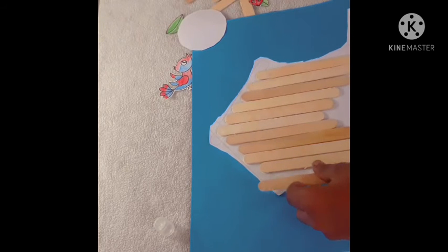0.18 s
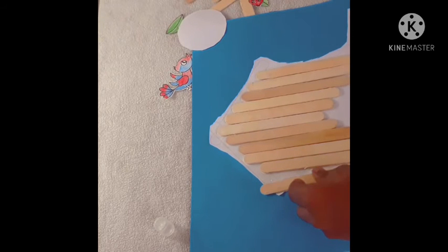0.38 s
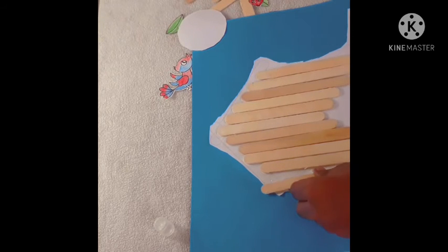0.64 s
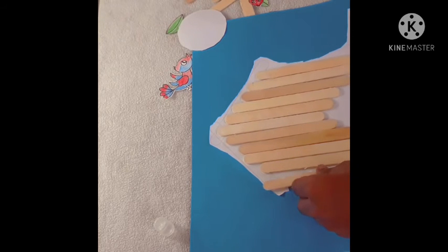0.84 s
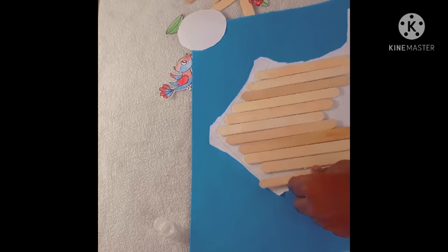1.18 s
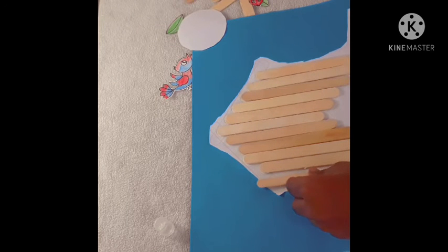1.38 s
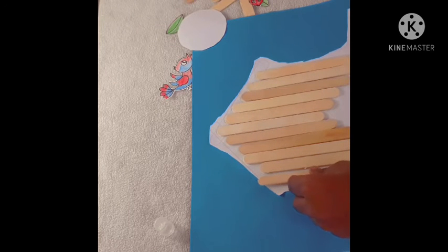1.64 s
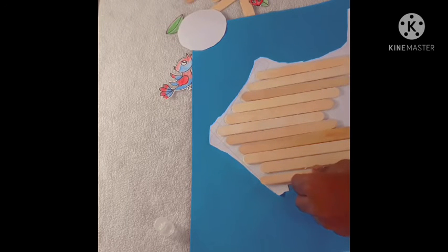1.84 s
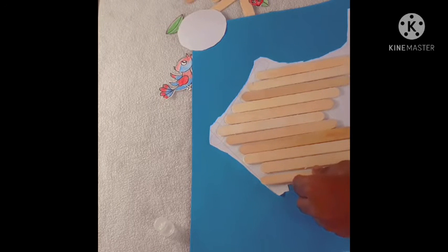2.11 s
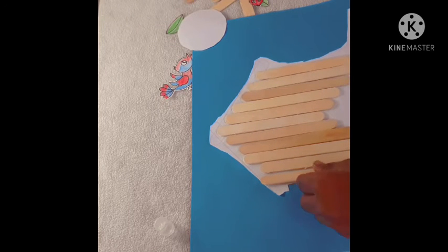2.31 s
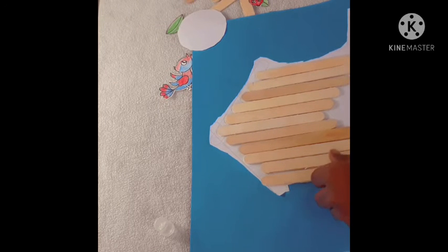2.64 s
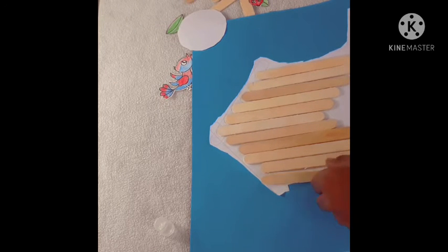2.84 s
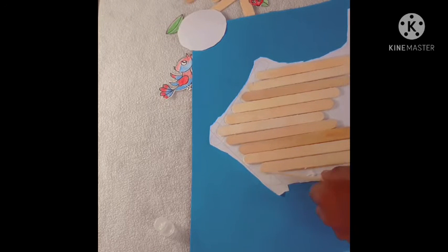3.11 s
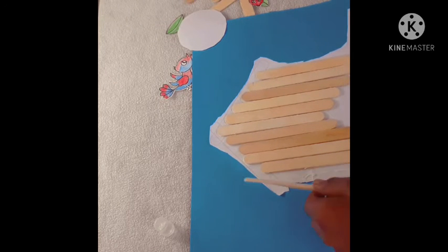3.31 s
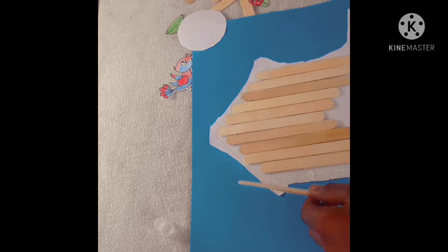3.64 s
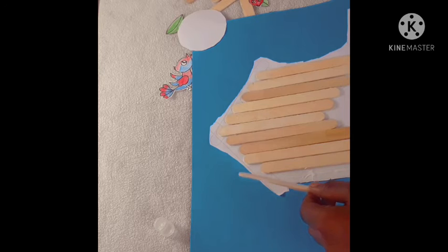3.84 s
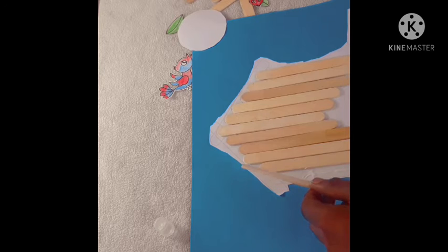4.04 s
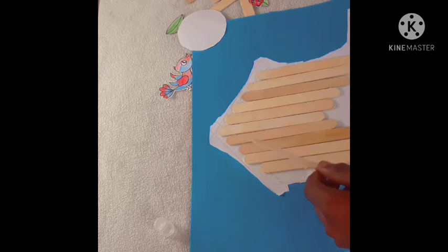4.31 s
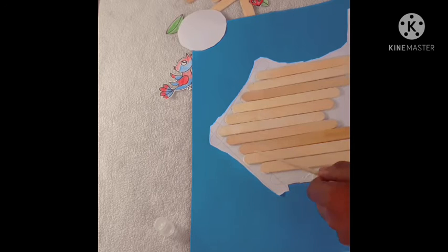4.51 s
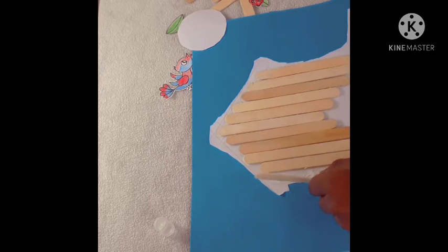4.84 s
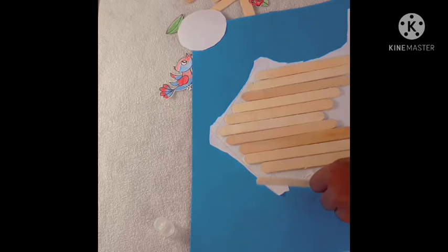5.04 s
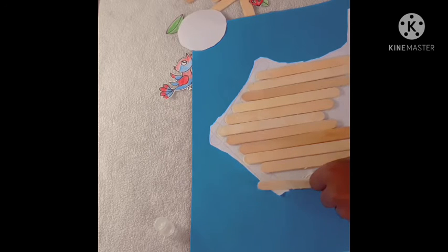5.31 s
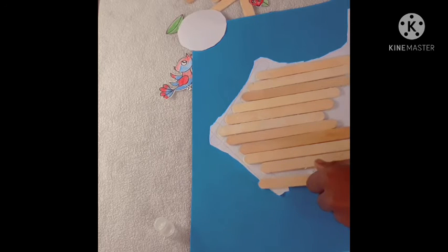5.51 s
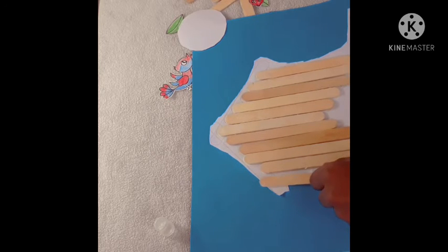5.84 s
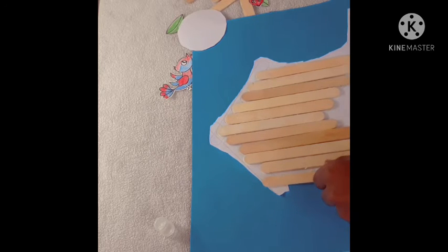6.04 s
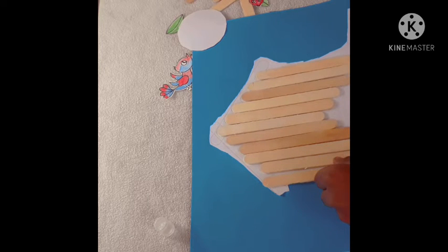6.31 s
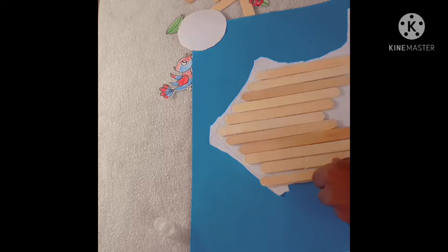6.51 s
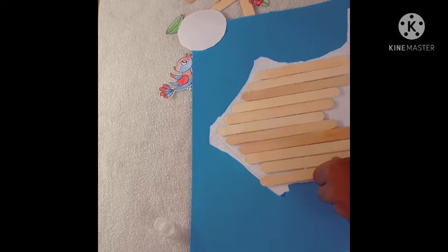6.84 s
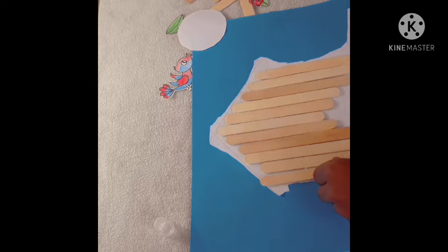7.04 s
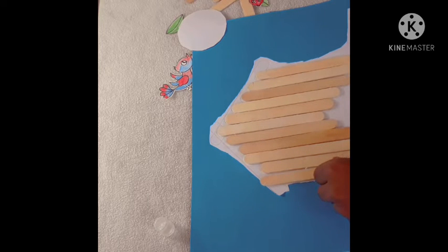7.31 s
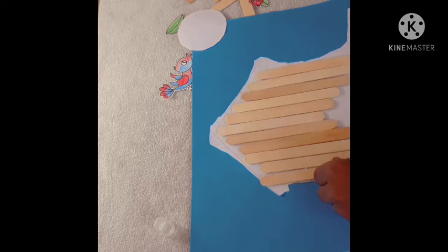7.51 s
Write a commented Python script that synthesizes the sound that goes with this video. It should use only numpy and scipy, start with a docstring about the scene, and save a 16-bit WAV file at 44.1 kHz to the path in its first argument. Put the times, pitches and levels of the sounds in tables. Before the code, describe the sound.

Steady electrical buzz and hiss over a soft fan, with a few light taps and rubs of wooden craft sticks on paper.

```python
"""A quiet room, phone microphone close to wooden craft sticks being laid on a paper picture.
Throughout, mains switching edges buzz and spit in the microphone lead, over a fan and preamp hiss.
A stick slides and knocks twice at the start; faint, thin rings follow. From 2.6 s come lighter taps
and short rubs of wood on paper. Static clicks at 5.0 and 6.7 s, and two faint tones fade at the end."""
import sys
import numpy as np
from scipy import signal
from scipy.fft import rfft, irfft, next_fast_len
from scipy.io import wavfile
from scipy.ndimage import uniform_filter1d

SR = 44100
rng = np.random.default_rng(int(sys.argv[2]) if len(sys.argv) > 2 else 0)


def dump_mix(stems):
    """Bounce the given channels to the path in sys.argv[1] as a 16-bit WAV at rate SR."""
    frames = np.atleast_2d(stems).T  # one column per channel
    limited = np.clip(frames, -1, 1)  # hard clip at full scale
    pcm = np.round(limited * 32767).astype(np.int16)
    wavfile.write(sys.argv[1], SR, pcm)


N = 338247
MAINS_HZ, TOP_HZ = 49.948, 15500
KNOCK_HZ = 2200  # crack pitch of a full knock; glancing touches are higher

# switching edges in one mains cycle: time_ms, spike_height, spike_corner_hz, rebound_height, needle_height
EDGES = [(.23, .00041, 3200, -.0158, .019), (3.33, .0001, 4800, .0026, .006),
         (8.55, -.00054, 3400, .0195, .002), (10.24, 0, 3400, 0, -.016), (13.3, .0001, 6200, .0005, -.009),
         (16.88, -.00066, 3750, .0164, .008)]
# spectrum of the interference's treble: frequency_hz, gain_db
TREBLE_COLOUR = [(1000, -28), (3500, -37), (6000, 1), (10000, 0.5), (14000, -5.5), (15100, 3),
                 (15600, -0.5)]
# sliding strokes of sticks and fingers: middle_s, length_s, level_db, centre_hz
STROKES = [(0.148, 0.13, -58.5, 7500), (.678, 0.07, -59, 7200), (2.71, 0.14, -58, 4400),
           (2.931, 0.11, -59.5, 7000), (2.987, 0.02, -48, 4400), (3.054, .04, -52, 4160),
           (4.297, 0.055, -45, 510), (4.3, 0.075, -57, 3960), (4.555, .11, -56, 2900),
           (5.69, .14, -59.5, 4970), (5.998, .08, -61, 6000), (6.158, 0.04, -52, 3200)]


def amp(db):
    """Decibels to gain."""
    return 10 ** (np.asarray(db) / 20)


def unit(x):
    """Scaled to rms 1."""
    return x / np.sqrt(np.mean(x ** 2) + 1e-20)


def along(points, hz):
    """(frequency_hz, value) points read on a log axis."""
    point_hz, values = np.transpose(points)
    return np.interp(np.log(hz + 1), np.log(point_hz + 1), values)


def filtered(x, response):
    """x through a frequency response."""
    size = next_fast_len(len(x) + 8192)
    return irfft(rfft(x, size) * response(np.fft.rfftfreq(size, 1 / SR)), size)[:len(x)]


def noise(spectrum):
    """Noise of rms 1 with the given colour."""
    return unit(filtered(rng.standard_normal(N), lambda hz: amp(along(spectrum, hz))))


def band(size, centre_hz, width_hz):
    """Noise of rms 1 in one resonance."""
    hz = np.fft.rfftfreq(size, 1 / SR)
    detune = (hz ** 2 - centre_hz ** 2) / (hz * width_hz + 1e-9)
    return unit(irfft(rfft(rng.standard_normal(size)) / (1 + detune ** 2), size))


def fading(hz, width_hz, db, t60_s, rise_s=0.016):
    """A fuzzy tone that swells quickly and fades."""
    t = np.arange(SR) / SR
    return amp(db - 60 * t / t60_s) * (1 - np.exp(-t / rise_s)) * band(len(t), hz, width_hz)


def add(track, start_s, sound):
    """Mix a sound into the track."""
    part = track[max(round(start_s * SR), 0):][:len(sound)]
    part += sound[:len(part)]


def mains_buzz(buzz_db=-1.42, rebound_hz=203, coupling_hz=86, ripple=0.39):
    """Interference in the lead: each switching edge is a sharp spike and a slow rebound, every cycle."""
    # partials of the low hum: mains_multiple, rms_db
    hum_partials = [(1, -41.1), (2, -39), (3, -38), (4, -40.8), (5, -43.5), (6, -53.5), (7, -50.5),
                    (8, -49.5), (9, -54), (10, -50.3), (17, -57.5), (19, -57.5)]
    # wiry overtones that stand out of the buzz: mains_multiple
    overtones = [*range(14, 50, 6), *range(50, 99, 12), *range(51, 88, 12)]
    comb_db, comb_db_per_octave = -53.8, -5.5
    hz = MAINS_HZ * np.arange(1, int(TOP_HZ / MAINS_HZ) + 1)
    lag = lambda corner_hz: (1 + 1j * hz / corner_hz) ** -3
    delay = lambda ms: np.exp(-2j * np.pi * hz * ms / 1000)
    spikes = sum(delay(ms) * height * lag(corner) for ms, height, corner, _, _ in EDGES)
    rebounds = sum(delay(ms) * height for ms, _, _, height, _ in EDGES) * lag(rebound_hz)
    fine_ripple = ripple * uniform_filter1d(abs(spikes), size=15) * np.exp(2j * np.pi * rng.random(len(hz)))
    bass_cut = 1j * hz / (1j * hz + coupling_hz)  # the input's coupling capacitor
    harmonics = amp(buzz_db) * (spikes + rebounds + fine_ripple) * bass_cut
    # hum and comb keep their phases but take their own levels
    comb = [(k, comb_db + comb_db_per_octave * np.log2(k / overtones[0])) for k in overtones]
    multiple, db = np.transpose(hum_partials + comb)
    index = np.round(multiple).astype(int) - 1
    harmonics[index] *= np.sqrt(2) * amp(db) / abs(harmonics[index])
    size = 8192
    cycle = irfft(np.r_[0, harmonics], size) * size / 2
    return np.interp(np.arange(N) / SR * MAINS_HZ, np.arange(size) / size, cycle, period=1)


def mains_spit(spit_db=-2.3, jitter_ms=0.0058, wander_ms=0.031, scatter_db=2):
    """Needle pulses at the switching edges; their timing trembles, which blurs the highest overtones."""
    cycle_starts = np.arange(0, N / SR, 1 / MAINS_HZ)[:, None]
    edge_ms, *_, needle_height = np.transpose(EDGES)
    shape = len(cycle_starts), len(EDGES)
    wander = unit(uniform_filter1d(rng.standard_normal(cycle_starts.shape), size=60, axis=0))
    ms = edge_ms + jitter_ms * rng.standard_normal(shape) + wander_ms * wander
    position = ((cycle_starts + ms / 1000) * SR)[..., None]
    height = (needle_height * amp(spit_db + scatter_db * rng.standard_normal(shape)))[..., None]
    # a windowed sinc places each needle between samples
    index = position.astype(int) + np.arange(-7, 9)
    needles = height * np.sinc(index - position) * np.sinc((index - position) / 8)
    train = np.bincount(abs(index).ravel(), needles.ravel(), N)[:N]
    return filtered(train, lambda hz: amp(along(TREBLE_COLOUR, hz)))


def mains_sizzle(sizzle_db=-65.0, crest_db=-57, rise_ms=1.0, locked_share=0.74, rest_ms=(3.6, 8.3)):
    """Bright noise that builds towards each half cycle's first edge; much of it repeats with the mains."""
    cycle_ms = 1000 / MAINS_HZ
    ms = np.arange(N) / SR * 1000 % cycle_ms
    to_edge_ms = (EDGES[0][0] - ms) % (cycle_ms / 2)
    swell = np.exp(-(to_edge_ms / rise_ms) ** 2)
    active = (ms < rest_ms[0]) | (ms > rest_ms[1])
    repeating = np.resize(noise(TREBLE_COLOUR)[:round(SR / MAINS_HZ)], N)
    grain = np.sqrt(locked_share) * repeating + np.sqrt(1 - locked_share) * noise(TREBLE_COLOUR)
    return (amp(sizzle_db) * active + amp(crest_db) * swell) * grain


def fan(rush_db=-42.0, waver_hz=5):
    """A fan in the room: a soft rush of air with a few unsteady low tones."""
    # spectrum of the rush: frequency_hz, gain_db
    rush_colour = [(20, -13), (60, -10), (120, -3.5), (200, 0.5), (480, -1.5), (640, -9), (850, -7.5),
                   (1050, -4), (1400, -12), (2000, -16.5), (3000, -21.5), (4100, -25), (5200, -29.5),
                   (12000, -43.5)]
    # the fan's drone: pitch_hz, rms_db
    tones = [(185, -55), (198, -53.5), (258, -57.5), (396, -56), (493, -57.5)]
    return amp(rush_db) * noise(rush_colour) + sum(amp(db) * band(N, hz, waver_hz) for hz, db in tones)


def preamp(hiss_db=-63.5, whine_db=-79, whine_hz=13561):
    """The microphone preamplifier's steady hiss and thin whine."""
    # spectrum of the hiss: frequency_hz, gain_db
    hiss_colour = [(500, -8), (3000, -8), (8000, -2), (13000, -4), (14400, -5), (15100, -3), (15600, 2)]
    return amp(hiss_db) * noise(hiss_colour) + amp(whine_db) * band(N, whine_hz, width_hz=30)


def rubs(grain_db=3, relative_width=0.72):
    """Short, grainy swells of wood sliding on paper."""
    out, t = np.zeros(N), np.arange(-SR // 4, SR // 4) / SR
    for middle_s, length_s, db, hz in STROKES:
        grain = amp(grain_db * unit(uniform_filter1d(rng.standard_normal(len(t)), size=90)))
        friction = unit(grain * band(len(t), hz, relative_width * hz))
        swell = amp(db) * np.exp(-2 * (t / length_s) ** 2)
        in_scene = t > -middle_s
        add(out, middle_s + t[in_scene][0], (swell * friction)[in_scene])
    return out


def stick_touch(peak_db, hz, crack_t60_s=0.013, relative_width=1.4, soft_hz=10000):
    """A short, dry crack; the fuller the knock, the more it rings the stick's damped modes."""
    # modes of a stick lying on paper: pitch_hz, level_db, t60_s
    modes = [(1100, 6, 0.012), (1590, -3, .014), (1830, 16, 0.0095), (2390, 18, 0.0082), (2840, 4.5, 0.027),
             (3060, -25, .16), (4300, 1, 0.011), (6500, 3, 0.0077), (7500, -2, 0.0099)]
    knock_ring_db, ring_db_per_octave = -1.5, -11.5
    t = np.arange(SR // 6) / SR
    ring_db = knock_ring_db + ring_db_per_octave * abs(np.log2(hz / KNOCK_HZ))
    ring = sum(amp(db + rng.normal(0, 0.97) - 60 * t / t60_s) * np.sin(2 * np.pi * mode_hz * t)
               for mode_hz, db, t60_s in modes)
    crack = amp(-60 * t / crack_t60_s) * band(len(t), hz, relative_width * hz)
    # wood on paper is too soft a contact for the top octave
    lowpass = signal.butter(2, soft_hz, fs=SR, output="sos")
    tap = signal.sosfilt(lowpass, crack + amp(ring_db) * ring)
    return -amp(peak_db) * tap / abs(tap).max()


def catches(per_stroke=2, scatter=0.5):
    """A sliding stick catches: tiny ticks at random moments around each stroke's middle."""
    out = np.zeros(N)
    for middle_s, length_s, _, _ in STROKES:
        for offset in rng.standard_normal(per_stroke):
            add(out, middle_s + scatter * length_s * offset, stick_touch(peak_db=-38, hz=5000))
    return out


def taps(after_ring_hz=2800, after_ring_db=-29, pitch_follow=0.31):
    """Each stick set down cracks, followed by a brief, fuzzy after-ring, higher after a higher crack."""
    # sticks touching: start_s, peak_db, pitch_hz
    touches = [(0.2823, -17.5, 2100), (0.3012, -18, 2300), (2.638, -29, 4000), (2.729, -24, 4200),
               (2.992, -26.5, 4800), (3.057, -28, 3970), (4.481, -34, 2200), (5.405, -28, 3300),
               (5.596, -30, 4600), (6.1248, -29, 5200), (6.137, -22.5, 5440)]
    out = np.zeros(N)
    for start_s, db, hz in touches:
        add(out, start_s, stick_touch(db, hz))
        ring_hz = after_ring_hz * (hz / KNOCK_HZ) ** pitch_follow
        add(out, start_s, fading(ring_hz, width_hz=900, db=db + after_ring_db, t60_s=0.32))
    return out


def room(x):
    """A small room's tail, shorter in the treble."""
    # the room's decay: frequency_hz, t60_s
    decay = [(300, 0.22), (2800, 0.16), (6000, 0.073), (14000, 0.096)]
    hz, t, spectra = signal.stft(rng.standard_normal(SR // 2), SR, nperseg=256)
    tail = signal.istft(spectra * amp(-60 * t / along(decay, hz)[:, None]), SR, nperseg=256)[1]
    return signal.fftconvolve(x, tail / np.linalg.norm(tail))[:N]


def faint_rings(ping_width_hz=110):
    """Two thin, high pings and three lower tones, each fading away."""
    # high pings: start_s, level_db, t60_s
    pings = [(.655, -52, 0.49), (1.19, -61, .75)]
    # the two partials of every ping: pitch_hz, gain_db
    ping_partials = [(9900, -3.5), (10310, -1.5)]
    # lower tones: start_s, pitch_hz, width_hz, level_db, t60_s
    tones = [(.67, 2050, 170, -51, 1.4), (7.16, 1850, 40, -50.5, 1.6), (7.2, 400, 12, -41, 1.1)]
    out = np.zeros(N)
    for start_s, db, t60_s in pings:
        for hz, gain_db in ping_partials:
            add(out, start_s, fading(hz, ping_width_hz, db + gain_db, t60_s))
    for start_s, hz, width_hz, db, t60_s in tones:
        add(out, start_s, fading(hz, width_hz, db, t60_s))
    return out


def static_clicks(swing_decay_s=0.00024, snap_decay_s=0.00006):
    """Static discharges: a bright snap on one dry swing down and up."""
    # discharges: start_s, swing_peak_db, swing_hz, snap_peak_db, snap_hz
    discharges = [(4.9655, -19.5, 2930, -26, 10300), (6.6575, -16.5, 2790, -21, 10000)]
    out, t = np.zeros(N), np.arange(SR // 200) / SR
    for start_s, swing_db, swing_hz, snap_db, snap_hz in discharges:
        swing = np.exp(-t / swing_decay_s) * np.sin(2 * np.pi * swing_hz * t)
        snap = np.exp(-t / snap_decay_s) * np.cos(2 * np.pi * snap_hz * t)
        add(out, start_s, -amp(swing_db) * swing / abs(swing).max() + amp(snap_db) * snap)
    return out


def scene(room_db=-7):
    """Sticks close to the microphone and a fan in the room, under the electrical noise; mono."""
    sticks = taps() + catches()
    handling = sticks + amp(room_db) * room(sticks) + rubs()
    electrical = mains_buzz() + mains_spit() + mains_sizzle() + preamp() + static_clicks()
    return (electrical + fan() + handling + faint_rings())[None]


def record(dry):
    """The phone keeps nothing above its band limit."""
    return np.array([filtered(channel, lambda hz: hz < TOP_HZ) for channel in dry])


dry = scene()
out = record(dry)
dump_mix(out)
```